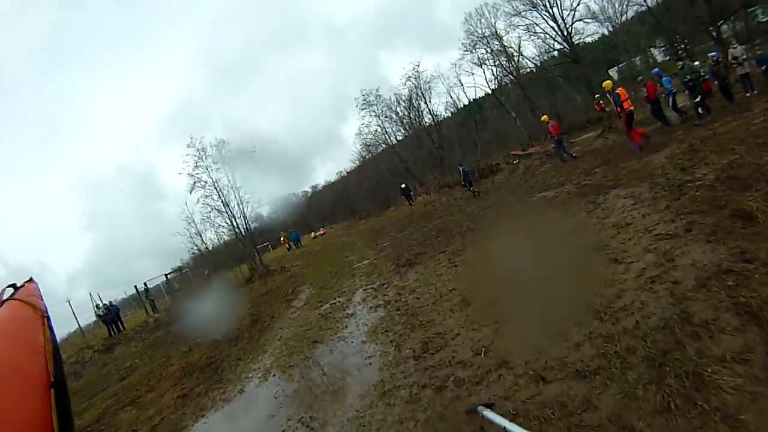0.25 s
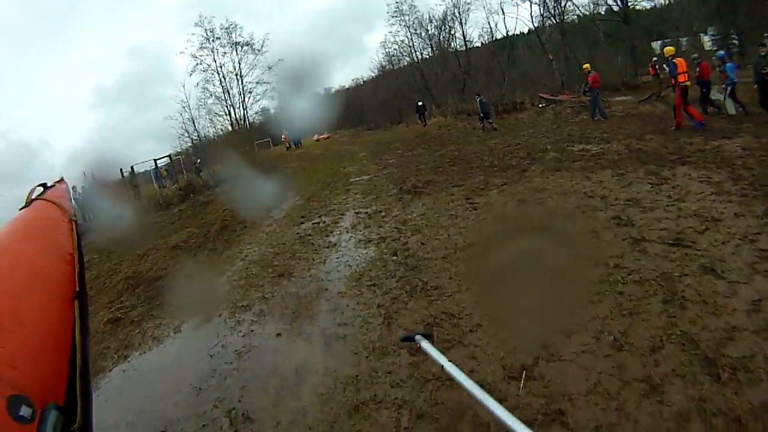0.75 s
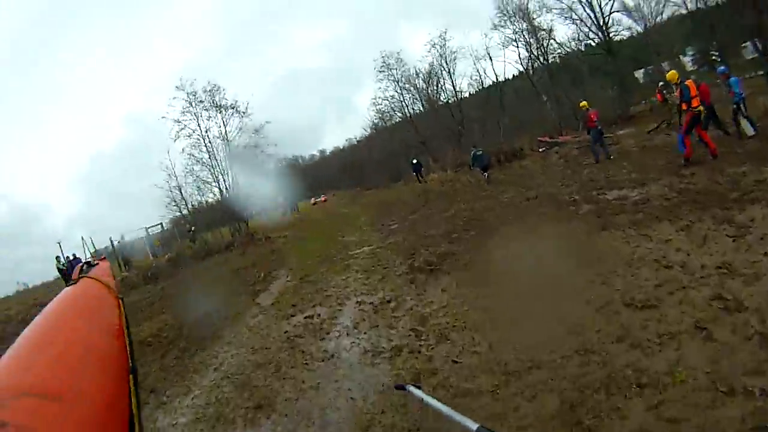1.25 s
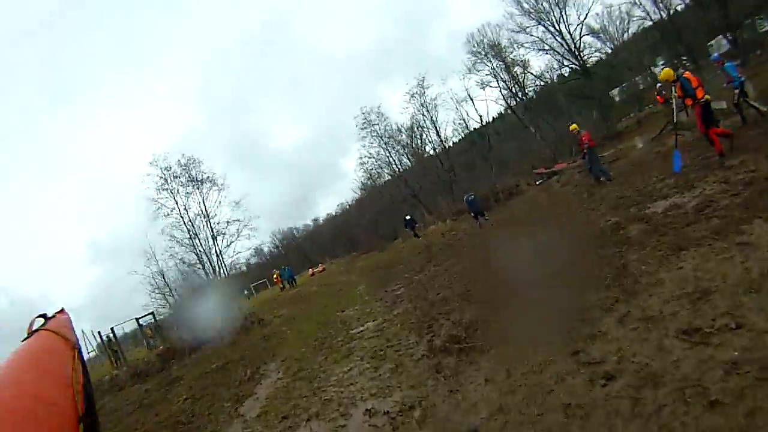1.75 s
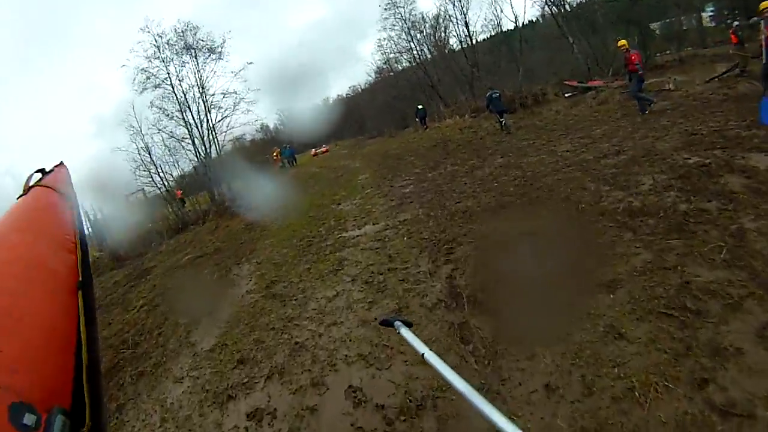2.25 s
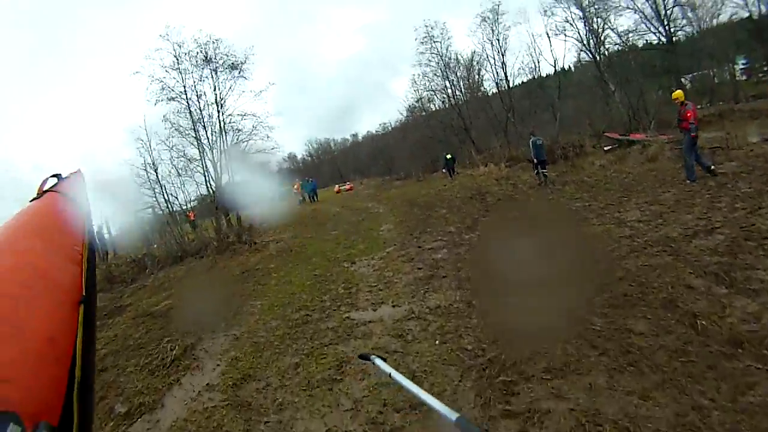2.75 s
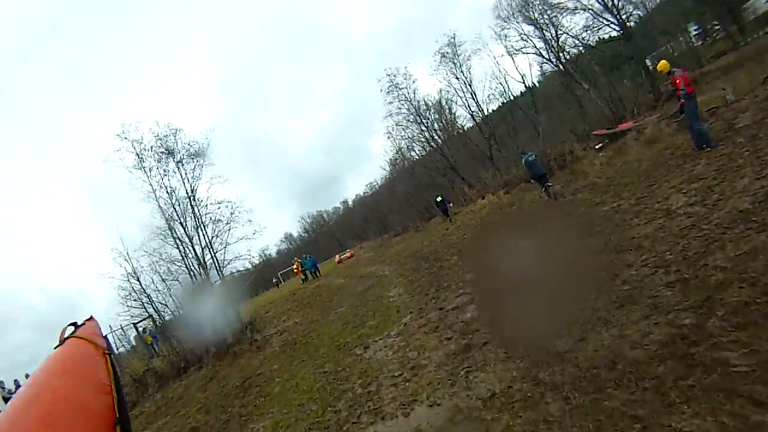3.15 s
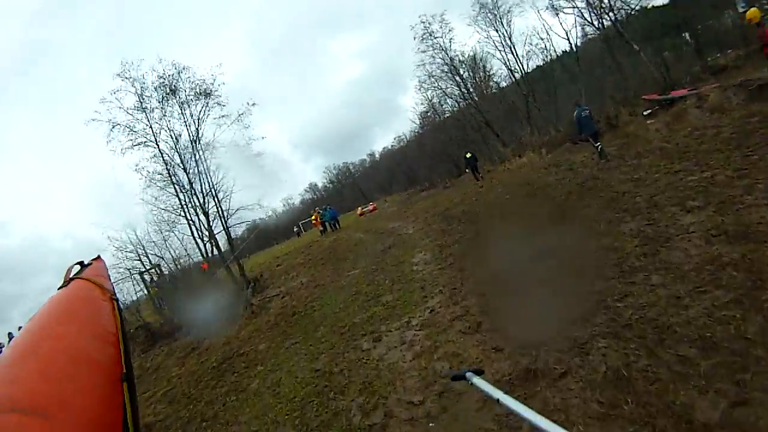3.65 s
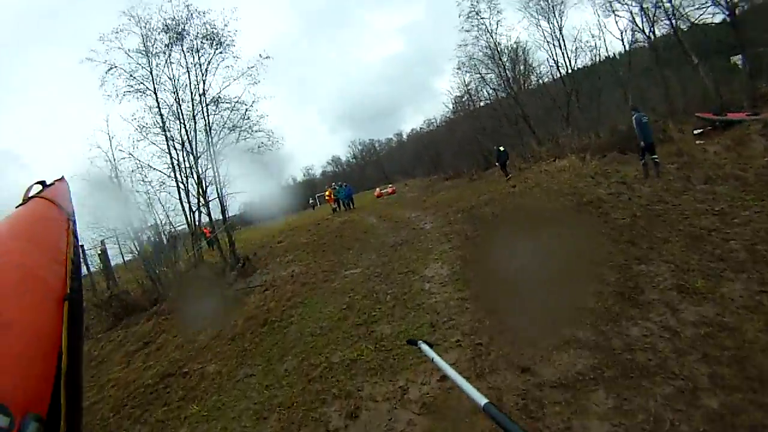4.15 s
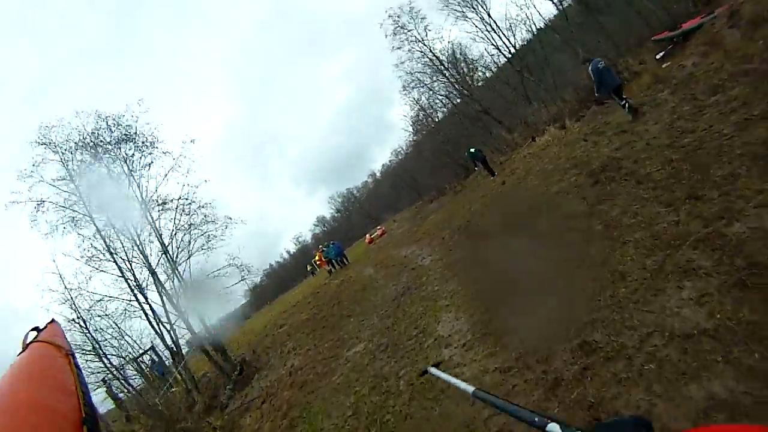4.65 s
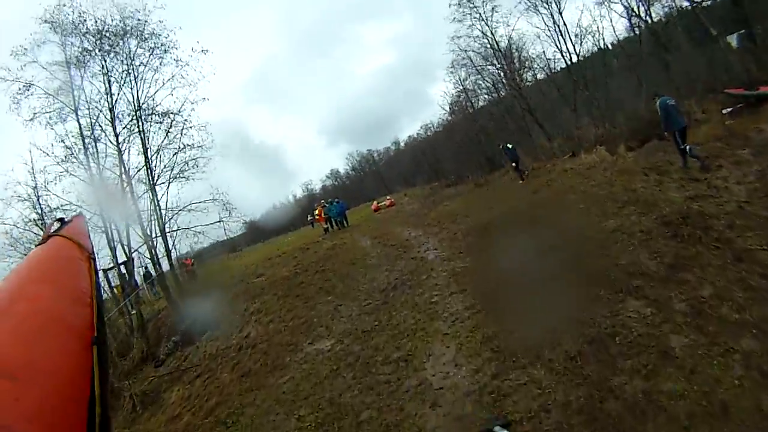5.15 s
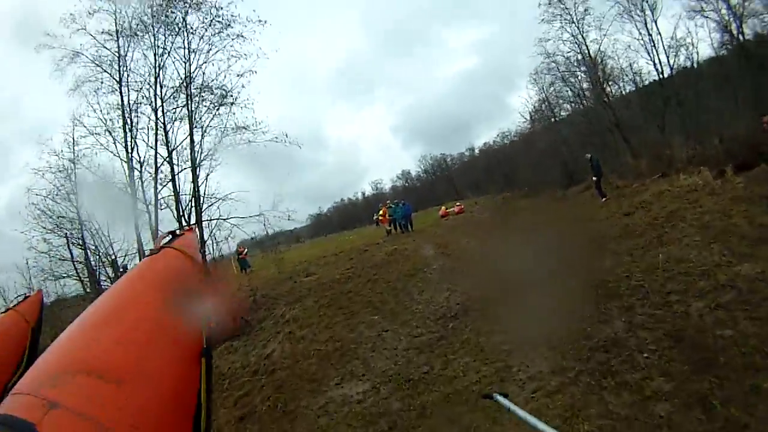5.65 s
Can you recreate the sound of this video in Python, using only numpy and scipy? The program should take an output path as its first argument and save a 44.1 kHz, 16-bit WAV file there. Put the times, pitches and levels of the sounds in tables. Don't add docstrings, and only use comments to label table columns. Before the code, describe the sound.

Almost everything is handling and wind noise inside a camera case: low booming thuds in running rhythm, lumpy flutter, a dull housing hum and brief hollow clicks of the mount. It begins with a violent distorted burst, keeps surging with steps and gusts, and ends on a long heavy shove. Open field, but no distant sounds or echo; left deep and full, right much thinner, faint hiss behind.

```python
import sys
import numpy as np
from scipy import signal
from scipy.fft import rfft, irfft, next_fast_len
from scipy.io import wavfile
from scipy.ndimage import uniform_filter1d, map_coordinates

SR = 44100
rng = np.random.default_rng(int(sys.argv[2]) if len(sys.argv) > 2 else 0)


def unload_wav(signal):
    wavfile.write(
        sys.argv[1],
        SR,
        np.round(np.clip(np.atleast_2d(signal).T, -1, 1) * 32767).astype(np.int16),
    )


def amplitude_ratio(level_db):
    exponent = np.asarray(level_db, float) / 20
    return 10 ** exponent


N = 260013

# t/s of overload, signed height/full scale, fall/ms
SHOVES = [(0.15, 1.15, 20.3), (0.1813, -1.58, 29), (0.2245, 1.23, 18.2), (0.5355, -0.97, 11),
          (0.9016, -1.06, 13.8), (1.215, -1, 10), (1.2328, 1.17, 13.3), (1.595, 1.37, 18.6),
          (1.6221, -1.46, 28.4), (1.656, 1.12, 20), (1.993, 1.25, 18.6), (2.2998, 1.12, 17.6),
          (3.045, -1.04, 18.3), (3.3786, -1, 11.3), (3.4002, 1.05, 12.7), (3.7361, 1.5, 20.3),
          (3.7646, -1.28, 31.7), (3.797, 1.16, 30), (4.782, -1, 18), (4.8206, 1.26, 12), (5.8362, 1.55, 15),
          (5.8546, -1.15, 18), (5.8762, 2, 63)]
# t/s, level/dB
GUSTS = [(0, -18.5), (.4, -2), (1, -2.5), (1.45, -1.5), (1.9, 8.5), (2.15, -4.5), (2.55, 0), (2.899, -4.5),
         (3.25, 3), (3.6, -4), (4.2, -0.5), (4.6, 0.5), (5, 2.5), (5.35, -0.5), (5.9, -2.5)]
# t/s, rumble level/dB, pounding level/dB
FOOTFALLS = [(0.172, -5, -13), (0.531, -10, -35), (0.898, -12.5, -14), (1.23, -6, -25.5), (1.628, -9, -16),
             (1.998, -13, -16.5), (2.302, -9.5, -23), (2.709, -13, -24), (3.06, -9.5, -17),
             (3.411, -8, -30.5), (3.778, -4.5, -8.5), (4.088, -9.5, -27), (4.388, -16.5, -21.5),
             (4.762, -8.5, -16.5), (5.108, -15.5, -34), (5.52, -17, -25.5), (5.859, -10.5, -30)]
# rumble t/s, pounding t/s, flutter t/s
SWELL_S = (0.053, .045, 0.077)
FADE_S = (0.053, .04, 0.037)
# f/Hz, level/dB per Hz
RUMBLE = [(2, -13), (6, -6.5), (12, 0), (18, -0.5), (24, -4), (33, -17.5), (45, -13.5), (70, -120)]
POUNDING = [(20, -120), (32, -2.5), (45, 4), (75, -0.5), (95, -15), (120, -26), (200, -120)]
FLUTTER = [(60, -120), (100, 2.5), (200, -5), (300, -13), (650, -27), (800, -37.5), (1500, -47.5),
           (3000, -120)]
# t/s, peak level/dB, level of the frame's low share/dB
KNOCKS = [(0.084, -48, 17.5), (0.529, -27.5, 4.5), (0.866, -28, 7), (1.099, -28, 8), (1.149, -48.5, 16.5),
          (1.565, -46, 17.5), (1.781, -28.5, 6.5), (2.351, -25, 5.5), (2.998, -74, 20), (3.033, -27, 7.5),
          (3.851, -35.5, 9), (3.915, -26.5, 5.5), (4.066, -30.5, 3), (4.419, -31, 10), (4.484, -26, -20),
          (4.691, -27.5, -11), (5.173, -24, 4.5), (5.511, -39.5, 14.5)]
# t/s, peak level/dB, f/Hz
THUDS = [(0.1729, -12, 239.5), (0.402, -35.5, 187), (0.566, -21.5, 177), (.815, -17.5, 144),
         (0.88, -15, 186), (1.197, -22.5, 172), (1.243, -20, 167), (1.615, -18, 178.6), (1.62, -20, 299),
         (1.813, -26.5, 170), (2.258, -25.5, 178.5), (2.319, -21.5, 186), (2.673, -24.5, 177),
         (2.81, -21, 183), (3.672, -28, 202), (3.752, -11.5, 167.1), (3.759, -31, 293.6),
         (4.099, -32.5, 250), (4.353, -23, 176), (4.506, -19, 170), (4.712, -26, 200), (4.779, -18, 199),
         (5.762, -38, 186), (5.8269, -17.5, 184)]
# f/Hz, level/dB, time to die by 60 dB t/s
CASE_MODES = [(580, -24, 0.0084), (670.5, 0.5, 0.038), (922, 4.5, 0.026), (1177, 2, 0.022),
              (1510, 1, 0.0097), (1765, -18.5, 0.02), (2550, -11.5, 0.012)]
FRAME_MODES = [(141.3, 1, 0.042), (198, 2.5, .05), (350, -4, 0.016)]
# f/Hz, width/Hz, level/dB
HOUSING = [(72.4, 14.5, 1.5), (184, 32, -18)]
# t/s, level/dB
LURCHES = [(0.328, -40), (.6, -29.5), (.76, -28), (1.42, -30), (1.87, -35), (2.43, -34.5), (2.63, -37),
           (3.641, -31), (3.97, -35), (4.5, -18.5), (5.37, -38)]
# f/Hz, level/dB per Hz
HISS = [(300, -120), (700, -3.5), (1500, -7.5), (3000, -10), (4500, -12.5), (5300, -14.5), (5990, -22.5)]


def shoved(low):
    t = np.arange(N) / SR
    push, pinned = np.zeros(N), np.zeros(N)
    gaps_s = np.diff(np.transpose(SHOVES)[0], prepend=-1)
    for (s, height, fall_ms), gap_s in zip(SHOVES, gaps_s):
        rise_ms = 7.5 if gap_s < 0.04 else 13
        crossing = np.arcsin(min(0.95 / abs(height), 1))
        moments = [s - rise_ms / 1000, s, s + fall_ms / 1000]
        swing = np.sin(np.interp(t, moments, [0, crossing, np.pi]))
        push += height * swing
        pinned += swing
    hold = np.clip(uniform_filter1d(1.6 * pinned, size=500), 0, 1)
    return uniform_filter1d(push, size=160) + low * (1 - 0.93 * hold)


def wind():
    gust_db = wind_level()
    s, rumble_db, pounding_db = np.transpose(FOOTFALLS)
    flutter_db = 0.6 * pounding_db - 31.5

    rumble_gain = amplitude_ratio(gust_db - 26.5) + swells(s, rumble_db, SWELL_S[0], FADE_S[0])
    pounding_gain = amplitude_ratio(gust_db - 39) + swells(s, pounding_db, SWELL_S[1], FADE_S[1])
    flutter_gain = amplitude_ratio(gust_db - 51) + swells(s, flutter_db, SWELL_S[2], FADE_S[2])

    rumble = rumble_gain * amplitude_ratio(7.5) * noise(RUMBLE)
    pounding = pounding_gain * amplitude_ratio(6.0) * unit(amplitude_ratio(2.5 * wobble(14)) * noise(POUNDING))
    flutter = flutter_gain * amplitude_ratio(7.5) * unit(amplitude_ratio(3.5 * wobble(25)) * noise(FLUTTER))

    low = rumble + pounding
    ceiling = 0.8
    return low / (1 + np.abs(low / ceiling) ** 4) ** (1 / 4), flutter


def wind_level():
    return np.interp(np.arange(N) / SR, *np.transpose(GUSTS))


def swells(times, peaks_db, swell_s, fade_s):
    since = np.arange(N) / SR - times[:, None]
    drop = np.maximum(-since / swell_s, since / fade_s)
    return amplitude_ratio(peaks_db[:, None] - 10 * drop).sum(axis=0)


def mount():
    x = np.zeros(N + SR)
    t = np.arange(SR // 8) / SR
    chances = rng.standard_normal((len(KNOCKS), 10))
    for (s, db, low_db), chance in zip(KNOCKS, chances):
        case = amplitude_ratio(db - 8.5) * ring(CASE_MODES, t, 0.0012, chance)
        frame = amplitude_ratio(db + low_db + 3.5) * ring(FRAME_MODES, t, 0.00045, chance[len(CASE_MODES):])
        x[round((s + 0.001) * SR):][:len(t)] += case + frame
    for s, db, hz in THUDS:
        t60 = 9.5 / hz
        x[round(s * SR):][:len(t)] += ring([(hz, db + 4.5, t60)], t, 0.0017, [0])
    return x[:N]


def ring(modes, t, attack, chance):
    tones = 0
    for k, (hz, db, t60) in enumerate(modes):
        envelope = amplitude_ratio(db + 2.6 * chance[k] - 60 * t / t60)
        tones = tones + (-1) ** k * envelope * np.sin(2 * np.pi * hz * t)
    return tones * (1 - np.exp(-t / attack))


def hum():
    def response(f):
        return sum(amplitude_ratio(db) * (1j * f * width / (centre ** 2 - f * f + 1j * f * width)) ** 2
                   for centre, width, db in HOUSING)

    shake = unit(amplitude_ratio(2.5 * wobble(12)) * filtered(rng.standard_normal(N), response))
    steady = amplitude_ratio(1.2 * wind_level() - 47.5)
    return (steady + swells(*np.transpose(LURCHES), 0.031, 0.048)) * shake


def hiss():
    shared = amplitude_ratio(-66) * noise(HISS)
    return shared + amplitude_ratio(-70) * np.array([noise(HISS), noise(HISS)])


def noise(spectrum):
    f, db = np.transpose(spectrum)

    def response(hz):
        return amplitude_ratio(np.interp(np.log(hz + 1), np.log(f + 1), db))

    return unit(filtered(rng.standard_normal(N), response))


def filtered(x, response):
    m = next_fast_len(N + SR // 2)
    return irfft(rfft(x, m) * response(np.fft.rfftfreq(m, 1 / SR)), m)[..., :N]


def wobble(rate):
    knots = rng.standard_normal(int(N * rate / SR) + 4)
    return map_coordinates(knots, [np.arange(N) * rate / SR])


def unit(x):
    return x / np.sqrt(np.mean(x ** 2) + 1e-20)


def scene():
    low, flutter = wind()
    sound = shoved(low + hum()) + flutter + mount()
    return np.array([sound, sound])


def gain_control(x, wait, pace, limit=0.96):
    step_db, deepest_db = 0.5, 6.1
    grip = 41.0
    t = np.arange(SR // 40) / SR - wait
    loss = np.zeros(N + len(t))
    over = uniform_filter1d(np.abs(x), size=60)
    i = 0
    while len(hits := np.flatnonzero(over[i:] * amplitude_ratio(-loss[i:N]) > limit)):
        i += hits[0]
        stretch = pace[i]
        excess = over[i:i + int(0.004 * SR)].max() - limit
        dive = np.sin(np.pi / 2 * np.clip(t / (0.0041 * stretch), 0, 1)) ** 2
        climb = np.clip((t - 0.005) / (0.009 * stretch), 0, 1) ** 1.45
        dip = min(deepest_db, grip * excess) * (dive - climb)
        loss[i:i + len(t)] = np.maximum(loss[i:i + len(t)], dip)
        i = min(i + int(0.010 * SR), N)
    loss = loss[:N] * (1 + 0.034 * wobble(700))
    return amplitude_ratio(-step_db * np.round(loss / step_db))


def thinned(x):
    hz, _, z = signal.stft(x, SR, nperseg=512)
    gate_db = np.interp(hz, [9500, 10800, 12800, 14000], [-125, -101.5, -99, -95.5])
    level = uniform_filter1d(np.abs(z), size=5, axis=1)
    level = uniform_filter1d(level, size=3, axis=2)
    band = np.clip((15800 - hz) / 900, 0, 1)
    keep = (level > amplitude_ratio(gate_db)[:, None]) * band[:, None]
    return signal.istft(z * keep, SR, nperseg=512)[1][:, :N]


def top_cut(x):
    return signal.sosfilt(signal.butter(12, 16550, fs=SR, output="sos"), x)


def record(dry):
    pace = np.exp(0.1 * wobble(40))
    left = dry[0] * gain_control(dry[0], wait=0.00126, pace=pace)
    right = dry[1] * gain_control(dry[1], wait=0.0008, pace=1.03 * pace, limit=1.035)
    cut_hz = 320
    right = filtered(right, lambda hz: 1j * hz / (cut_hz + 1j * hz))
    pair = np.clip(np.array([left, right]) + hiss(), -1, 1)

    held_rate, card_rate = 12000, 48000
    slow = signal.resample_poly(pair, held_rate, SR, axis=1)
    held = np.repeat(slow, card_rate // held_rate, axis=1)
    out = signal.resample_poly(held, SR, card_rate, axis=1)[:, :N]
    return top_cut(np.clip(thinned(out), -1, 1))


dry = scene()
out = record(dry)
unload_wav(out)
```